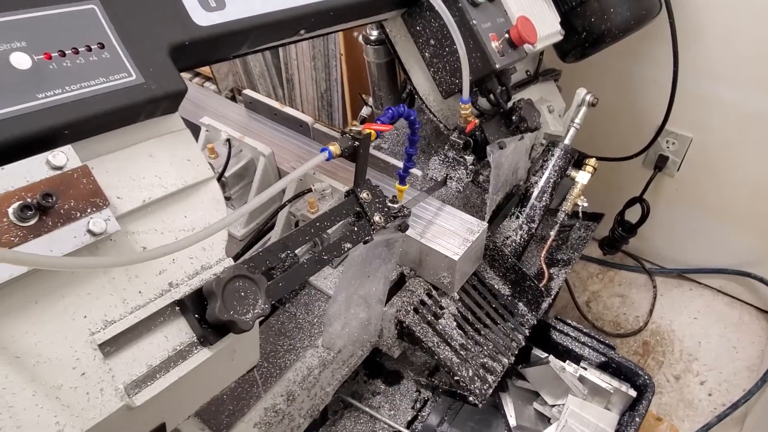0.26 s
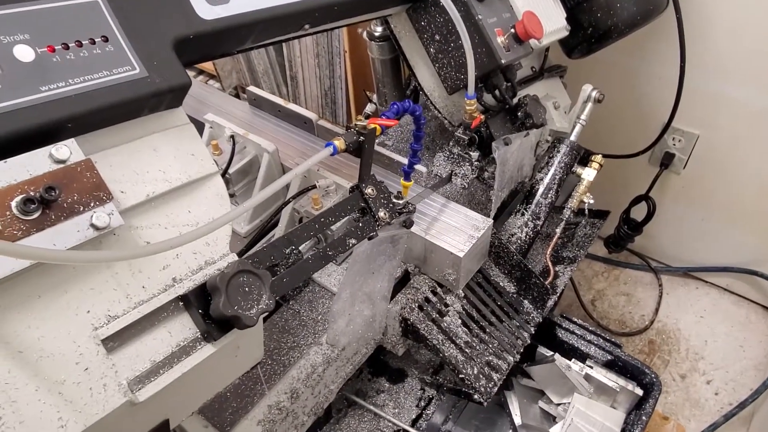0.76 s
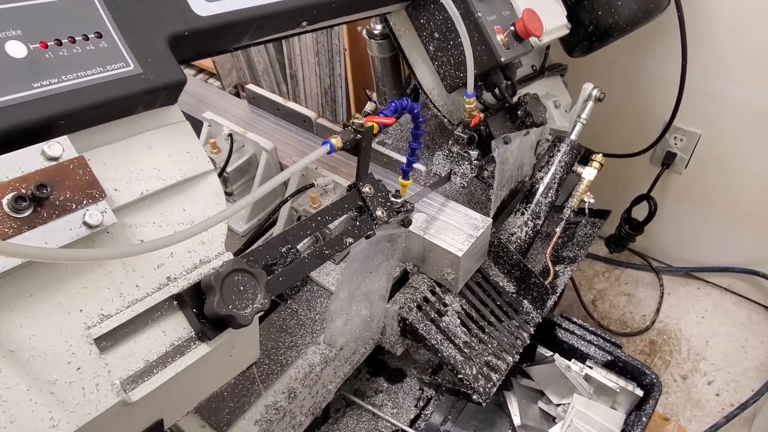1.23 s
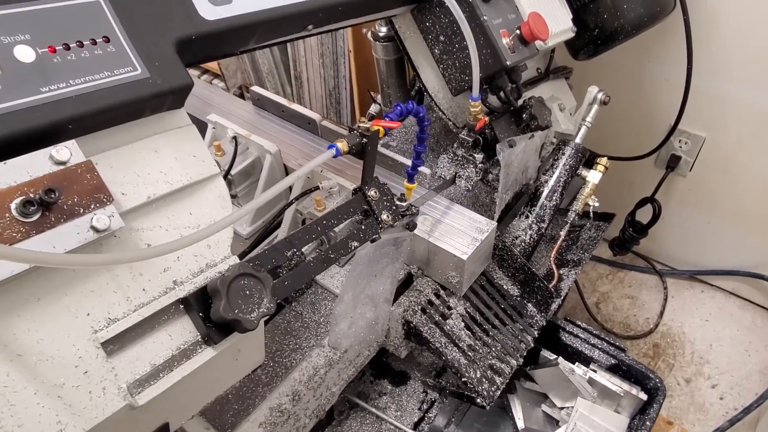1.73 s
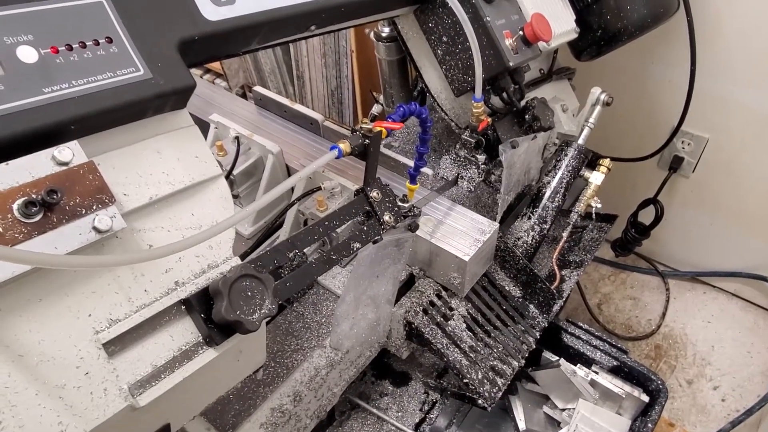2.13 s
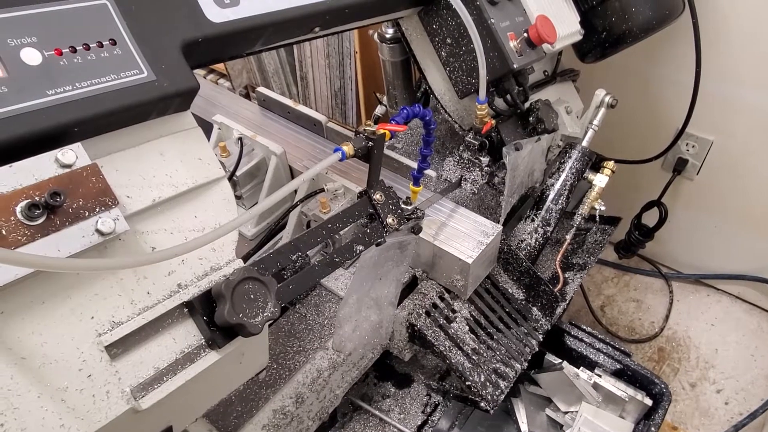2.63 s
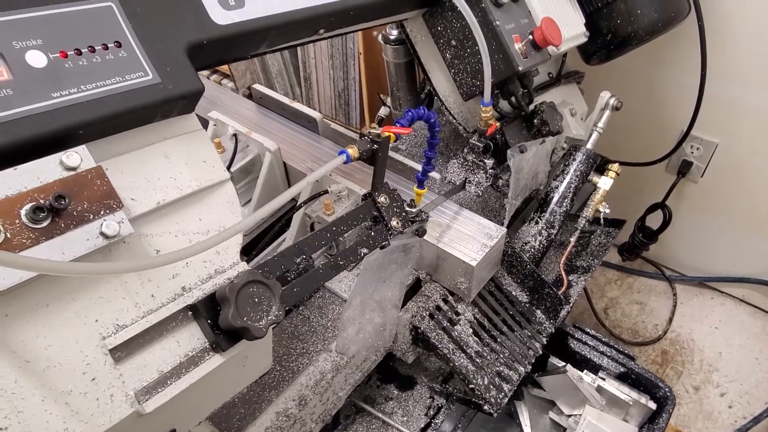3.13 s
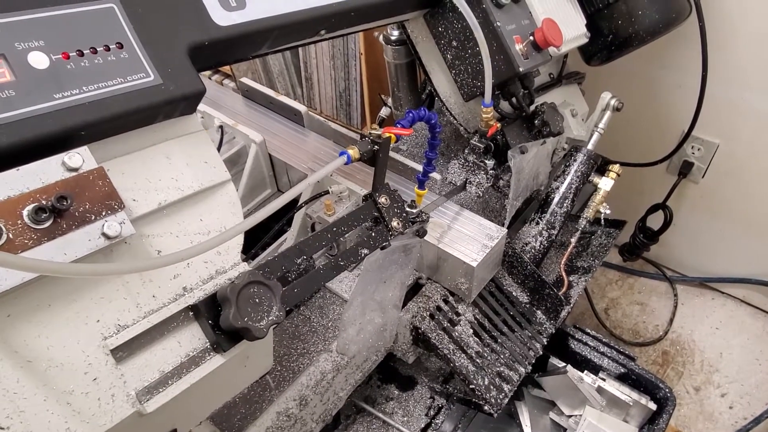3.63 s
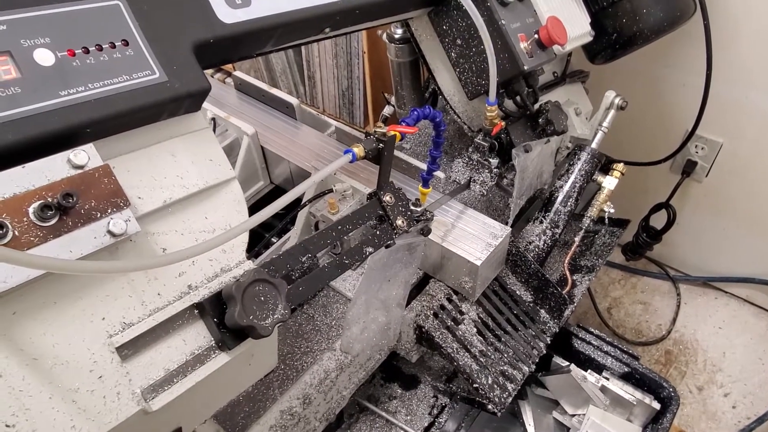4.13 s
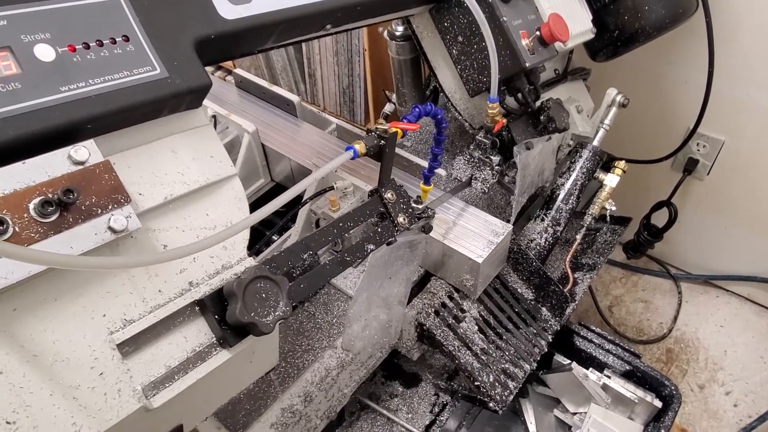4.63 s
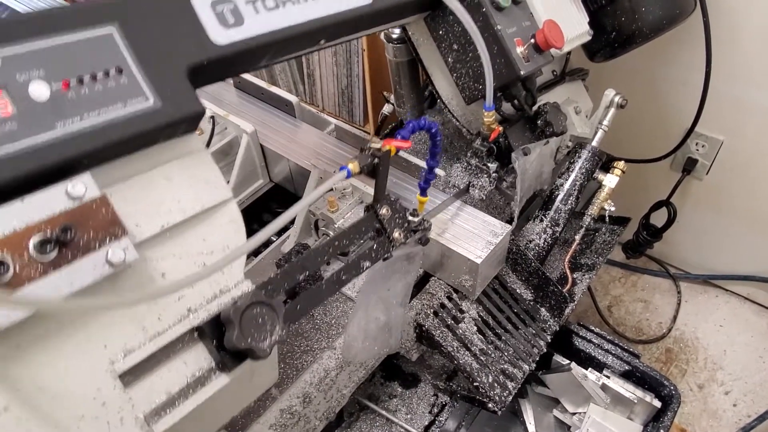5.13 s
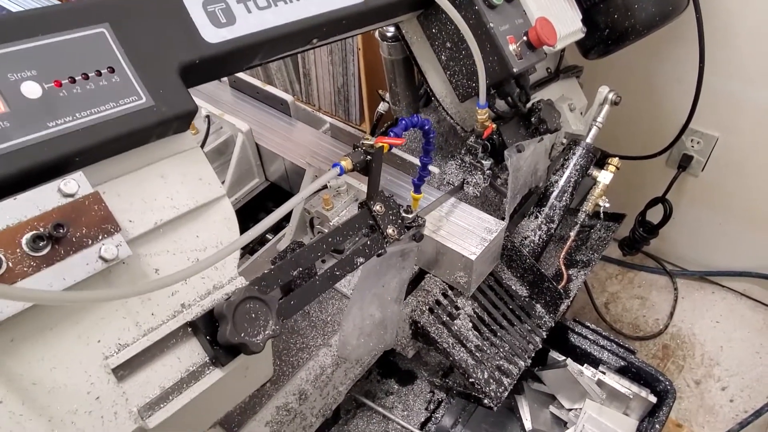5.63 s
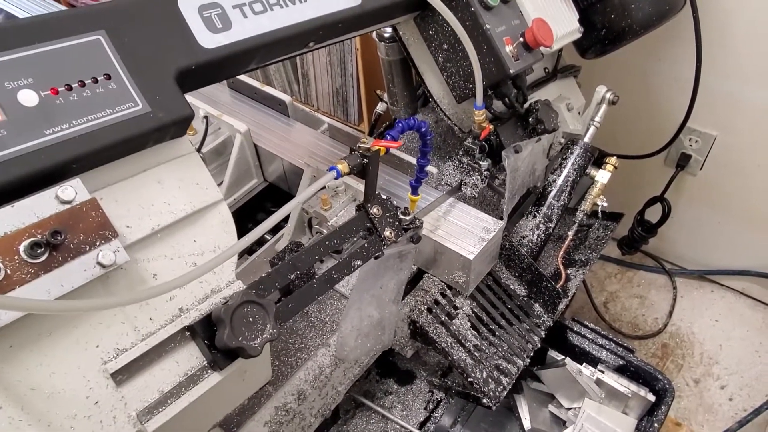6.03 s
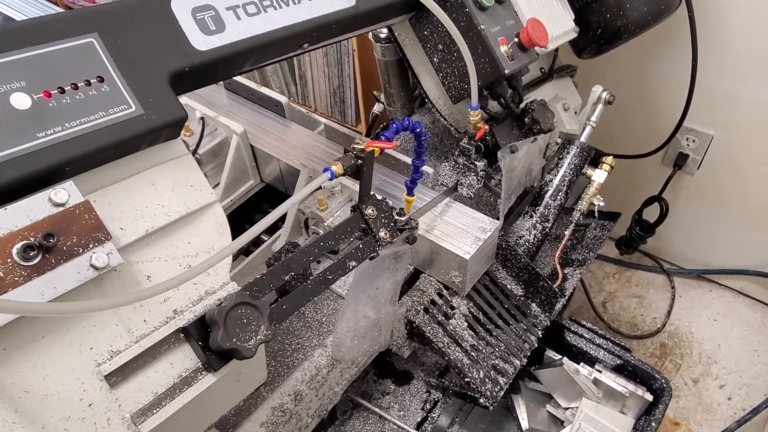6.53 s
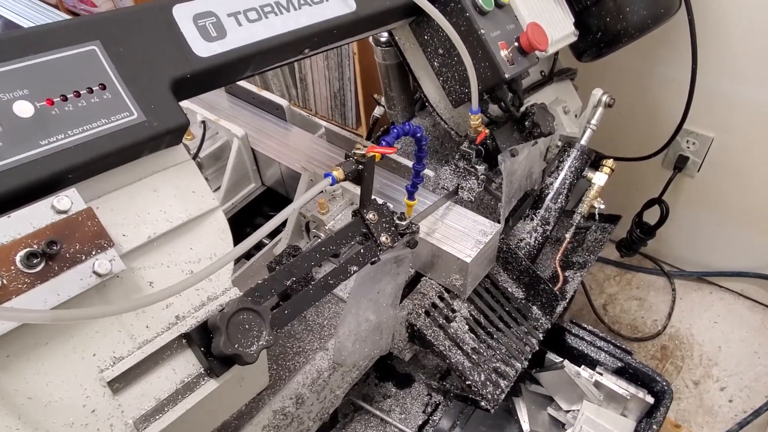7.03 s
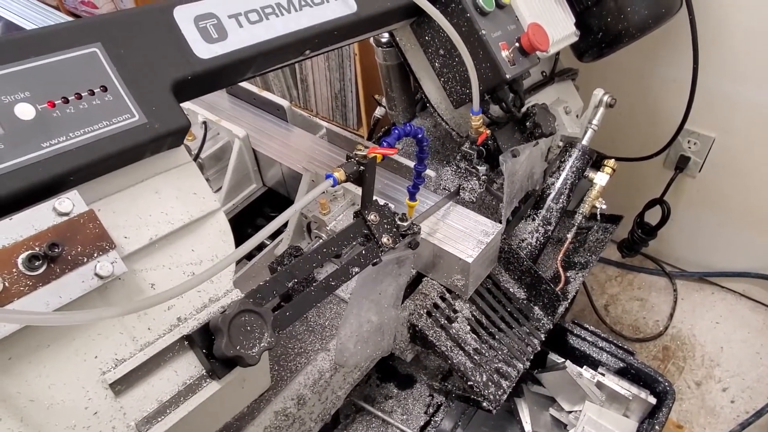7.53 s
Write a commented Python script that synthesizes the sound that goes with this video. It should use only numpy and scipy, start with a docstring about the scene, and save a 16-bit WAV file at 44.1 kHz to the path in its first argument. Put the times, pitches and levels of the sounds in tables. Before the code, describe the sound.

A small workshop, close stereo microphone about a metre from an automatic band saw. At first a faint airy bleed with thin whistles fades within a second over a low, slowly beating motor drone, with tiny drips and ticks. At 1.26 s a deep clunk and short bright air puff, a dull knock at 1.39, then coolant drips, densest near 1.6. At 2.75 small metal raps and another puff; the table jolts, rumbles and scrapes softly, with a quick falling squeak at 3.15 and lighter movement at 3.3. Around 3.98-4.06 a juddering heavy clunk, jaw clank and hisses. From 4.2 the motor and blade run: rough broadband rush, shimmering metallic scrape, low hum, rapid housing knocks, wavering whine near 1 kHz. A thump and longer hiss hit at 5.05; squeaks at 5.45, 6.27 and 7.46. The ringing dulls slightly after 5.5; blade slaps come from 7.35, clustering around 7.6-7.75, still running at the end.

```python
"""An automatic bandsaw in a small workshop, heard from a metre away at a two-port microphone.
Its vises clunk (frame and jaw modes), valves vent (shaped noise), air bleeds away and coolant drips
(short noise bands), and the feed table rumbles and scrapes. Then the motor starts and the blade runs:
filtered noise for the blade in its guides, ringing housing knocks, mains hum and a gear whine.
Short rubbed tones squeak; behind it all lie the shop's low noise and two beating motor tones."""
import sys
import numpy as np
from scipy import signal
from scipy.fft import rfft, irfft, next_fast_len
from scipy.io import wavfile
from scipy.ndimage import uniform_filter1d

SR = 44100
rng = np.random.default_rng(int(sys.argv[2]) if len(sys.argv) > 2 else 0)


def store_wav(level_fs):
    """Save 16-bit WAV to argv[1]."""
    pcm = np.round(np.clip(np.atleast_2d(level_fs), -1, 1) * 32767)
    wavfile.write(sys.argv[1], SR, pcm.T.astype(np.int16))


N = 342657
SIZE = next_fast_len(N)

# the feed table sliding on its rails: (t/s, rumble level/dB, hiss level/dB)
FEED_TRAVEL = [(2.84, -28, -48), (2.97, -39, -57.5), (3.158, -45.5, -55.5), (3.232, -39.5, -59),
               (3.294, -33, -52), (3.342, -43.5, -55), (3.952, -41.5, -49), (3.96, -39, -50)]


def undb(db):
    """Decibels to gain."""
    return 10 ** (np.asarray(db) / 20)


def unit(x):
    """Scaled to rms 1."""
    return x / np.sqrt(np.mean(x ** 2))


def across(table, hz):
    """A (f/Hz, value) table read on a log-frequency axis."""
    f, v = np.transpose(table)
    return np.interp(np.log(np.maximum(hz, 1)), np.log(f), v)


def track(table, column, silent=True):
    """A curve column at every sample; levels fade to nothing just outside the curve."""
    s, v = np.transpose(table)[[0, column]]
    if silent:
        s = np.r_[s[0] - .04, s, s[-1] + .3]
        v = np.r_[-120, v, -120]
    return np.interp(np.arange(N) / SR, s, v)


def walk(rate):
    """Random levels held 1 / rate s and slewed twice."""
    k = int(SR / rate)
    held = np.repeat(rng.standard_normal(N // k + 1), k)
    return uniform_filter1d(uniform_filter1d(held, k), k)[:N]


def tone(pitch):
    """A sine that follows a pitch in Hz at every sample."""
    return np.sin(2 * np.pi * np.cumsum(pitch) / SR)


def spread(colour, narrow_db=0):
    """Two-channel noise of a colour; the bass is alike left and right, the treble is not."""
    # stereo width: (f/Hz, side minus mid level/dB)
    side_db = [(60, -26), (110, -27.5), (200, -24), (380, -7.5), (700, -2), (1290, 3), (2380, 1.5),
               (4400, 2), (8120, 1.5), (15000, 1)]
    hz = np.fft.rfftfreq(SIZE, 1 / SR)
    mid, side = rfft(rng.standard_normal((2, SIZE))) * undb(across(colour, hz))
    side = side * undb(across(side_db, hz) - narrow_db)
    out = irfft(np.array([mid + side, mid - side]), SIZE)[:, :N]
    return out / np.sqrt(np.mean(out.mean(0) ** 2))


def ring(x, modes, speed=False):
    """Decaying modes (f/Hz, level/dB, t60/s) driven by x: their travel, or their speed."""
    out = 0
    for hz, db, t60 in modes:
        r = np.exp(-np.log(1000) / (t60 * SR))
        w = 2 * np.pi * hz / SR
        top = [1, -r * np.cos(w)] if speed else [0, r * np.sin(w)]
        out = out + undb(db) * signal.lfilter(top, [1, -2 * r * np.cos(w), r * r], x)
    return out


def both(x, echo_db=-8):
    """A near source to two ports; a wall echo reaches them with opposite sign."""
    echo = undb(echo_db) * np.roll(x, 68)  # 68 samples: 1.5 ms
    return np.array([x + echo, x - echo])


def wobble(hz, width_hz):
    """A short two-channel band of noise: slow noise carried up to hz."""
    span = max(int(SR / width_hz), 1)
    noise = rng.standard_normal((4, 6000))
    slow = uniform_filter1d(uniform_filter1d(noise, span), span) * np.sqrt(span)
    turn = 2 * np.pi * hz * np.arange(6000) / SR
    return slow[:2] * np.cos(turn) + slow[2:] * np.sin(turn)


def guard_rings():
    """Blade guard and guides ring to uneven scraping; blade tension makes their pitch waver."""
    # resonances: (f/Hz, width/Hz that sets the decay, early level/dB, late level/dB)
    guard_modes = [(1270, 33, -4.5, -8), (1460, 37, -4, -6), (1664, 41, 0, -3.5), (2133, 70, 3, -0.5),
                   (2252, 120, 4.5, 2.5), (3050, 180, 4, -5.5), (3300, 40, -2.5, -0.5), (3830, 41, 1.5, -1),
                   (4506, 79, -4, -7), (4628, 106, -4.5, -0.5), (4823, 100, 0.5, -10), (5716, 100, -10, -3),
                   (5910, 110, 2, -8.5), (6640, 290, -1.5, -2.5), (7014, 75, 1.5, -5),
                   (8250, 110, -6.5, -26)]
    on = 4 * SR  # silent before this sample
    # the teeth scrape in uneven grains; both ports hear part of the same scrape
    grains = rng.standard_normal((3, N)) * undb(3.6 * walk(300))
    scrape = (grains[:2] + 0.66 * grains[2])[:, on:]
    settled = np.clip((np.arange(on, N) / SR - 5.35) / 0.52, 0, 1)  # early to late levels
    guards = 0
    for hz, width, early_db, late_db in guard_modes:
        level_db = early_db + (late_db - early_db) * settled + 5.4 * walk(30)[on:]
        guards = guards + undb(level_db) * unit(ring(scrape, [(hz, 0, 3.62 / width)]))
    wander = np.cumsum(1 + .003 * walk(14))  # reading position; .003 is a share of pitch
    return unit(np.array([np.interp(wander, np.arange(on, N), g, left=0) for g in guards]))


def running_blade():
    """Noise of the blade in its guides, with slaps, over the frame's slower rumble."""
    # running blade: (t/s, rush level/dB)
    rush_level = [(4.18, -42.5), (4.24, -34.5), (4.37, -28), (4.52, -31), (4.62, -26), (4.97, -28.5),
                  (5.27, -31), (5.44, -27), (5.61, -31), (5.79, -29), (5.84, -32.5), (5.89, -25.5),
                  (5.97, -32), (6.12, -29), (6.17, -30.5), (6.28, -28), (6.48, -29.5), (6.9, -28.5),
                  (7.3, -28.5), (7.6, -27.5), (7.77, -27)]
    # rush spectrum: (f/Hz, level/dB per Hz)
    rush_colour = [(18, -49), (30, -13), (85, -2), (115, -6.5), (149, -13), (245, -1.5), (319, -17),
                   (364, -5.5), (499, -11.5), (684, -6.5), (913, -17.5), (988, -8.5), (1070, -15.5),
                   (1600, -18), (1850, -21), (2200, -17), (2580, -19.5), (3000, -19), (4650, -20),
                   (6300, -24), (6800, -29), (8080, -30.5), (16000, -30)]
    # the blade slaps its guides: (t/s, level/dB relative to the blade sound without slaps)
    slap_times = [(7.352, 2), (7.587, -1), (7.629, 6.5), (7.667, -2), (7.742, 1.5)]
    slap_t60_s = 0.094
    t = np.arange(N) / SR
    rush = spread(rush_colour, narrow_db=1.0) * undb(1.72 * walk(35))
    # the heavy frame answers the blade sluggishly: its rumble follows only the slow level
    rumble = signal.sosfilt(signal.butter(2, 1200, fs=SR, output="sos"), rush)
    slow_db = uniform_filter1d(track(rush_level, 1, False), size=SR // 3)
    start = np.clip((t - 4.17) / 0.0073, 0, 1)
    blade = undb(2.5) * (rush - rumble) + undb(-3.5) * guard_rings()
    slap = sum(undb(db - 60 * np.maximum(t - s, 0) / slap_t60_s) * (t > s) for s, db in slap_times)
    blade = blade * np.sqrt(1 + slap ** 2)
    return rumble * undb(slow_db + 2.0) * start + blade * undb(track(rush_level, 1))


def housing_knocks(motor):
    """Wheel knocks ring the housing: bursts of tooth chatter over a little steady rubbing."""
    # housing modes: (f/Hz, level/dB, t60/s)
    housing_modes = [(359, 5.5, 0.095), (545, -0.5, 0.039), (627.4, -1.5, 0.045), (696.6, -7.5, 0.17),
                     (786, 1.5, 0.076)]
    knock_rate, knock_s = 22.2, 6.5517  # knocks a second; start of one knock period, s
    # the knocks slip back part of a period, three times, 0.445 s apart
    slip_s, slip_gap_s, slip_turns = 6.44, .445, .345  # first slip, spacing, periods lost
    t = np.arange(N) / SR
    slips = sum(np.clip(10 * (t - slip_s - k * slip_gap_s), 0, 1) for k in range(3))
    turns = knock_rate * (t - knock_s) - slip_turns * slips
    size = undb(1.1 * rng.standard_normal(400))[np.floor(turns).astype(int) % 400]
    burst = np.exp(-((turns % 1 - .6) / 0.071) ** 2)
    chatter = tone(660 + 25 * walk(25))
    knocks = size * burst * chatter + 0.28 * rng.standard_normal(N)
    return both(unit(ring(knocks, housing_modes)), echo_db=-19) * undb(track(motor, 1))


def mains_hum(motor):
    """The iron of the motor pulls twice per 60 Hz mains cycle; a third harmonic joins in."""
    mains = 2 * np.pi * np.cumsum(60 + .15 * walk(4)) / SR
    twice = np.sin(2 * mains) * undb(1.5 + 1.0 * walk(9.8))
    third = np.sin(3 * mains) * undb(-7.5 + 4.5 * walk(5))
    return (twice + third) * undb(track(motor, 2))


def gear_whine():
    """One gear tone near 1 kHz, its pitch wavering, that swells and drops out."""
    # the swells: (t/s, level/dB)
    whine_level = [(4.2, -47), (4.26, -27), (4.38, -37), (4.45, -26.5), (4.48, -45), (4.53, -30.5),
                   (4.73, -37), (4.76, -23), (4.82, -24), (4.9, -33.5), (4.94, -21.5), (5.05, -35),
                   (5.3, -25.5), (5.33, -35.5), (5.43, -27.5), (5.54, -32), (5.67, -28.5), (5.74, -42),
                   (6.08, -34), (6.17, -51), (6.23, -29.5), (6.3, -35.5), (6.43, -27.5), (6.46, -47),
                   (6.62, -38), (6.68, -30.5), (6.85, -33), (6.92, -52), (7.0, -32.5), (7.12, -42.5),
                   (7.2, -32), (7.25, -40), (7.54, -31), (7.77, -36)]
    # pitch, wandering at first, then steadier: (t/s, f/Hz)
    whine_pitch = [(4.2, 1005), (4.72, 1017), (4.8, 1003), (5.14, 1018), (5.3, 989.4), (5.42, 1013),
                   (5.6, 988), (5.75, 1011), (6.2, 1009), (7.77, 1008)]
    whine = np.sqrt(2) * tone(track(whine_pitch, 1, False) + 4 * walk(40)) * undb(1.6 * walk(35))
    return both(whine * undb(track(whine_level, 1)), echo_db=-32.0)


def saw():
    """The running saw: blade, wheel knocks in the housing, motor hum and gear whine."""
    # the motor's drive: (t/s, housing knock level/dB, relative mains hum level/dB)
    motor = [(4.2, -35.5, -47), (4.38, -31.5, -31.5), (4.7, -37.5, -29.5), (5.3, -35.5, -32),
             (5.6, -32.5, -33.5), (5.95, -37, -31.5), (6.2, -32, -31.5), (6.63, -30, -29.5),
             (7.4, -32, -29), (7.5, -29, -30.5), (7.77, -35.5, -29)]
    return running_blade() + housing_knocks(motor) + mains_hum(motor) + gear_whine()


def clunks():
    """Each blow pushes the heavy frame for some ms and raps the jaws; the clamp judders before it seats."""
    # blows of pistons and jaws: (t/s, relative thump level/dB, push length/ms, jaw ring level/dB)
    blows = [(1.262, -24, 4.9, -49), (1.270, -25, 3.5, -50), (1.274, -7.5, 5.8, -33),
             (1.283, -33, 7.2, -24), (1.394, -39.5, 1.9, -52), (2.758, -30.5, 4.5, -45),
             (2.774, -36, 4.7, -30), (2.79, -31, 3.5, -43), (2.803, -27, 1.2, -34),
             (2.817, -23.5, 2.5, -32), (2.84, -42, 2.5, -39), (3.264, -36, 2.8, -46),
             (3.987, -16.5, 2.5, -45), (4.040, -0.5, 9.9, -27), (4.0565, -32, 5.2, -20),
             (4.064, -33, 5.5, -8.5), (4.082, -47, 1.5, -27), (5.038, -32, 8.6, -40),
             (5.054, -3, 8.4, -18.5)]
    # frame modes: (f/Hz, level/dB, t60/s)
    frame_modes = [(50.4, -15.5, 0.67), (91, -2.5, 0.17), (117.6, 7, 0.076), (170, 10, 0.076),
                   (252, 0.5, 0.18)]
    # jaw modes: (f/Hz, level/dB, t60/s)
    jaw_modes = [(548, -9, 0.23), (558.7, -11.5, 0.18), (722, -10, 0.07), (788, -18.5, 0.26),
                 (1150, -13.5, 0.1), (2090, -23, .1)]
    push, rap = np.zeros(N), np.zeros(N)
    judder = [(3.9935 + k * .0115, -14, 5.5, -24) for k in range(4)]  # columns as in blows
    for s, thump_db, ms, ring_db in list(blows) + judder:
        i, n = int(s * SR), int(ms * SR / 1000)
        push[i:i + n] -= undb(thump_db) * np.hanning(n) / n
        grit = 1 + 0.4 * rng.standard_normal(200)
        rap[i:i + 200] += undb(ring_db) * np.exp(-np.arange(200) / 40) * grit / 12
    return 1.18 * ring(push, frame_modes, speed=True) * np.ones((2, 1)) + both(ring(rap, jaw_modes))


def exhausts():
    """Air bursts from the valves: quick rise, short hold, dying pressure, each through its own pipes."""
    # bursts: (t/s, level/dB, rise/ms, hold/ms, t60/s, treble tilt/dB per octave,
    #          shrill band level/dB, muffler ring level/dB)
    puffs = [(1.258, -35.5, 6.6, 5.6, 0.4, -1, -7, -12), (1.274, -25.5, 8.4, 26.5, 0.2, 0, 5.5, -4.5),
             (2.751, -26, 2, 24, 0.2, 0.5, -5.5, -7.5), (3.984, -39.5, 3.1, 10, 0.41, -7, -5, -14),
             (4.028, -31, 1.1, 31, 0.19, 8, 4, -14), (4.044, -24, 9.3, 6.3, 0.31, -4.5, -3, -22),
             (5.049, -22.5, 6.2, 26, 0.61, 4, -1, -15)]
    # jet spectrum: (f/Hz, level/dB per Hz)
    jet_colour = [(120, -29), (200, -0.5), (424, -19.5), (548, 0.5), (1100, -6), (2650, 0.5), (2910, 0.5),
                  (5520, 0.5), (9580, -15), (10700, -11), (16000, -15.5)]
    # muffler resonances: (f/Hz, level/dB)
    muffler_modes = [(1520, -7), (2010, -2), (2410, 1), (2970, -7.5), (3290, 5), (3950, -6), (4560, -3),
                     (4980, 0), (5300, -5), (5540, 0.5), (7760, -3.5)]
    shrill_hz, shrill_octaves = 4600, 0.62  # middle and width of a jet's shrill band
    banded_db, band_hz = 3, 40  # depth and width of the narrow pipe resonances
    half = SR // 2  # longest burst, samples
    jet = spread(jet_colour, narrow_db=1.5)
    muffled = unit(ring(jet, [(hz, db, 0.062) for hz, db in muffler_modes]))  # t60 in s
    gusts = undb(1.4 * walk(120))
    t, out = np.arange(N) / SR, np.zeros((2, N))
    hz = np.fft.rfftfreq(half, 1 / SR)
    octaves = np.log2(np.maximum(hz, 300) / shrill_hz)
    for s, db, rise_ms, hold_ms, t60, tilt_db, shrill_db, muffler_db in puffs:
        a = slice(int(s * SR), int(s * SR) + half)
        age = t[a] - s
        dying = np.maximum(age - (rise_ms + hold_ms) / 1000, 0)
        shape = np.minimum(age * 1000 / rise_ms, 1) * undb(db - 60 * dying / t60)
        # every burst has its own random thicket of pipe resonances; bins are 2 Hz apart
        thicket = unit(uniform_filter1d(rng.standard_normal(len(hz)), size=max(int(band_hz / 2), 1)))
        colour_db = tilt_db * octaves + shrill_db * np.exp(-(octaves / shrill_octaves) ** 2)
        # the last term takes back the power that the thicket adds on average
        colour_db = colour_db + banded_db * thicket - banded_db ** 2 * np.log(10) / 20
        air = jet[:, a] + undb(muffler_db) * muffled[:, a]
        out[:, a] += shape * gusts[a] * irfft(rfft(air) * undb(colour_db), half)
    return out


def feed_table():
    """The table on its rails: a starting jolt rings it, then it rumbles, scrapes and sings."""
    # rumble spectrum: (f/Hz, level/dB per Hz)
    rumble_colour = [(18, -38), (30, -0.5), (108, 3), (140, -5.5), (194, -10), (248, -7.5), (400, -20),
                     (520, -49), (880, -120)]
    # scraping hiss spectrum: (f/Hz, level/dB per Hz)
    hiss_colour = [(240, -44), (400, -12), (520, 2.5), (1490, -10), (2880, -7.5), (5030, -16.5),
                   (5600, -16.5), (8110, -24.5), (16000, -21.5)]
    # table modes: (f/Hz, level/dB, t60/s)
    table_modes = [(818, 6, 0.53), (512, -4, 0.46)]
    rumble = spread(rumble_colour) * undb(track(FEED_TRAVEL, 1))
    jolt = undb(-46.5) * (np.arange(N) == int(2.805 * SR))  # jolted as it sets off
    # the rails keep it singing
    rails = undb(-11) * both(unit(ring(rng.standard_normal(N), table_modes)))
    hiss = spread(hiss_colour, narrow_db=2.0) * undb(2.0 * walk(32.25)) + rails
    return rumble + both(ring(jolt, table_modes)) + hiss * undb(track(FEED_TRAVEL, 2))


def squeaks():
    """Short rubbed tones with unsteady pitch; the first glides down quickly, the others hold theirs."""
    # squeaks of blade and rails: (middle t/s, half length/s, pitch f/Hz, starts higher by f/Hz, level/dB)
    rubs = [(3.153, 0.023, 2250, 530, -46), (3.32, 0.047, 609, 0.99, -51.5),
            (5.447, 0.059, 3840, 0.995, -29), (6.27, 0.027, 3850, 0.97, -36), (7.46, 0.017, 3330, 1.1, -30)]
    t, out = np.arange(N) / SR, 0
    for s, half, hz, higher_hz, db in rubs:
        glide = np.exp(-np.clip(t - s + 1.3 * half, 0, None) / 0.012)
        pitch = hz + higher_hz * glide + 0.0081 * hz * walk(200)
        out = out + tone(pitch) * np.exp(-((t - s) / half) ** 4) * undb(db + 2.5 * walk(120))
    return both(out, echo_db=-17)


def settling_song():
    """The machine still sings faintly as it settles: steady tones, each wavering in level on its own."""
    # tones: (f/Hz, level/dB)
    lines = [(57.9, 6), (170, 1.5), (228.6, -1.5), (262, 0), (351, -12.5), (371, -16), (398, -18),
             (436, -18.5), (463, -13), (555, -5.5), (587, -20.5), (705, -19), (786, -12.5), (812, -15),
             (995, -21.5)]
    t = np.arange(N) / SR
    song = sum(np.sin(2 * np.pi * (hz * t + rng.random())) * undb(db + 5.1 * walk(12)) for hz, db in lines)
    return both(unit(song), echo_db=-12.5)


def bleeding_air():
    """Air bleeding away at first: coloured noise, thin nozzle whistles and the settling machine."""
    # fading bleed: (t/s, level/dB)
    bleed_level = [(0, -44), (.2, -51.5), (.4, -58.5), (.7, -61), (1.0, -69.5), (1.24, -64.5)]
    # air spectrum: (f/Hz, level/dB per Hz)
    bleed_colour = [(120, -24.5), (530, -10.5), (900, -20), (1340, -27.5), (1770, -9), (1970, -13),
                    (2570, -4.5), (2860, -8), (6970, -9), (8870, -31), (16000, -17.5)]
    # thin whistles: (f/Hz, level/dB)
    nozzle_modes = [(2530, -2), (2600, -11), (2725, -8), (3155, -7.5), (3500, -3.5), (4603, -10),
                    (5170, -1.5)]
    noise = rng.standard_normal((2, N))
    whistles = unit(ring(noise, [(hz, db, .13) for hz, db in nozzle_modes]))  # t60 in s
    air = spread(bleed_colour, narrow_db=0.5)
    mix = air + undb(1.0) * settling_song() + undb(-2.5) * whistles
    return mix * undb(track(bleed_level, 1))


def drop(s, db, hz, splash_db, t60, pan_db=-3, width_hz=470):
    """One drop: a narrow plink inside a broad splash, dying in the tray; returns (start, sound)."""
    age = np.arange(6000) / SR
    sound = wobble(hz, width_hz) + undb(splash_db) * wobble(1.25 * hz, 3000)
    fade = undb(db - 60 * age / max(t60, .01)) * np.minimum(age / 0.00095, 1)
    return int(s * SR), sound * fade * undb(np.array([[pan_db], [-pan_db]]) / 2)


def trickle():
    """Small drops at random moments, pitches and levels, louder while the table moves."""
    rate, middle_hz, level_db, stirred_db = 53, 3400, -65, 5.5  # rate in drops a second
    rows = []
    for a, b, c in rng.random((int(rate * N / SR), 3)):
        s = a * N / SR
        stirred = FEED_TRAVEL[0][0] < s < FEED_TRAVEL[-1][0]
        db = level_db + stirred_db * stirred - 1.5 * np.log(1 - c)
        rows.append((s, db, middle_hz * 2 ** (1.3 * b ** 2 - .3), -5, .16, -4, 600))
    return rows


def coolant():
    """The louder drops, chip ticks and dull knocks, over a random trickle of small drops."""
    # the louder drops: (t/s, level/dB, pitch f/Hz, relative splash level/dB)
    loud_drops = [(0.816, -53, 3090, -4), (0.856, -54, 3160, -11), (1.02, -59, 1270, -20),
                  (1.155, -57, 3130, -16), (1.2017, -55, 3660, -17), (1.6, -45, 2990, -1.5),
                  (1.602, -47, 3890, -18), (1.613, -45, 4260, -13), (1.6466, -49.5, 3450, 5.5),
                  (1.6627, -48, 6900, -16.5), (1.766, -56.5, 3130, -19.5), (1.931, -52, 3310, -13),
                  (1.986, -53.5, 6300, -7), (1.9907, -54, 3460, -2), (2.158, -55, 2900, 0),
                  (2.218, -51, 3180, -9), (2.2584, -55.5, 3360, -16.5), (2.595, -59, 3060, -12),
                  (2.674, -55, 3220, -10), (2.905, -53, 6900, -20), (2.975, -58, 5600, -8),
                  (2.995, -44, 3300, -13), (3.29, -48.5, 3330, -13), (3.335, -54, 5500, -14)]
    # dry ticks of chips falling: (t/s, level/dB)
    chip_ticks = [(0.6569, -45), (1.049, -43), (1.1004, -46), (1.245, -51), (1.570, -50), (2.9567, -47),
                  (3.0455, -47)]
    # dull knocks inside the machine: (t/s, level/dB, t60/s)
    dull_knocks = [(.61, -58, .15), (.98, -63.5, 0.24), (1.391, -36.5, 0.23), (1.425, -43, 0.17),
                   (3.268, -46, .2)]
    # every row holds the arguments of drop()
    rows = [(*d, 0.21) for d in loud_drops]
    rows += [(s, db, 13000, -30, .022, 0, 8000) for s, db in chip_ticks]
    rows += [(s, db, 495, -25, t60, 0, 1100) for s, db, t60 in dull_knocks]
    out = np.zeros((2, N + 6000))
    for row in rows + trickle():
        i, sound = drop(*row)
        out[:, i:i + 6000] += sound
    return out[:, :N]


def shop():
    """The low noise of the shop, and two distant motors beating slowly against each other."""
    # room spectrum: (f/Hz, level/dB per Hz)
    shop_colour = [(15, -41), (25, -14), (60, -0.5), (95, -7), (111, -3.5), (132, -5), (175, -15.5),
                   (256, -12.5), (394, -32), (1130, -34.5), (1700, -27), (2160, -26), (3080, -16.5),
                   (3820, -35), (5000, -28), (16000, -37.5)]
    drone_hz, beat_hz, beat_s = 108, 5.6, .06  # lower motor; beats a second; moment of one swell
    room = spread(shop_colour, narrow_db=1.0) * undb(-64 + 2 * walk(2.8))
    turn = 2 * np.pi * (np.arange(N) / SR - beat_s)
    motors = np.cos(drone_hz * turn) + undb(-5) * np.cos((drone_hz + beat_hz) * turn)
    return room + undb(-60.5 + walk(3.7)) * motors


def scene():
    """The saw and its mechanisms over the low drone of the shop."""
    machine = saw() + clunks() + exhausts() + feed_table() + squeaks()
    return machine + bleeding_air() + coolant() + shop()


def record(dry):
    """The two ports lean differently across the spectrum; deep bass and the top are cut."""
    # microphone ports: (f/Hz, left minus right level/dB)
    port_lean = [(60, -3), (110, -1.0), (200, 1), (380, -3), (700, 1), (1290, -1), (2380, -2), (4400, -6),
                 (8120, -0.5), (15000, 3.5)]
    low_hz, top_hz = 41.7, 16050
    lean = across(port_lean, np.fft.rfftfreq(SIZE, 1 / SR))
    ported = irfft(rfft(dry, SIZE) * undb(np.array([lean, -lean]) / 2), SIZE)[:, :N]
    ported = signal.sosfilt(signal.butter(2, low_hz, "high", fs=SR, output="sos"), ported)
    return signal.sosfilt(signal.ellip(8, .2, 60, top_hz, fs=SR, output="sos"), ported)


dry = scene()
out = record(dry)
store_wav(out)
```